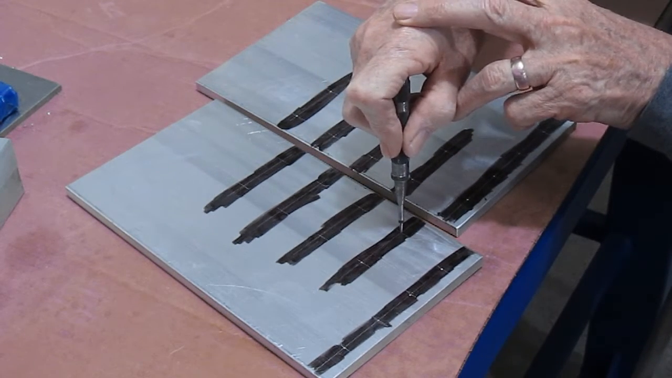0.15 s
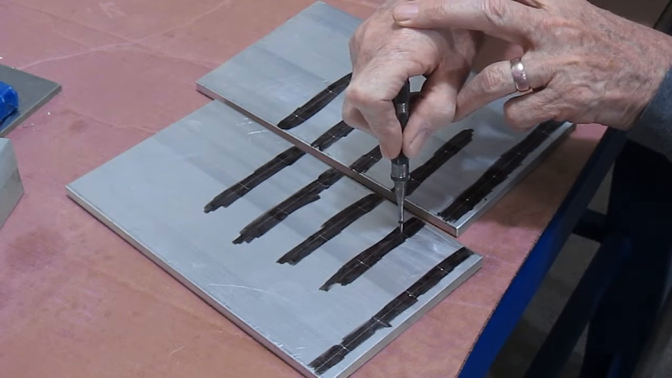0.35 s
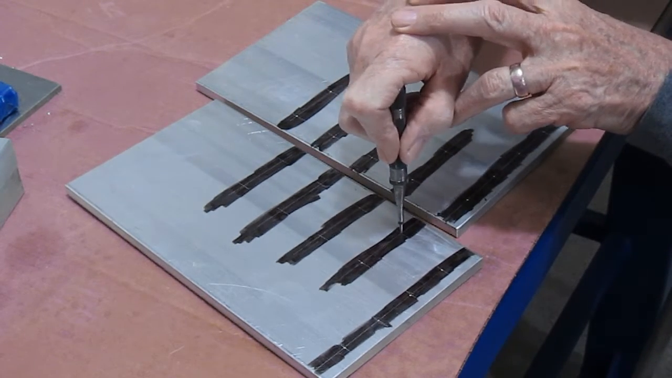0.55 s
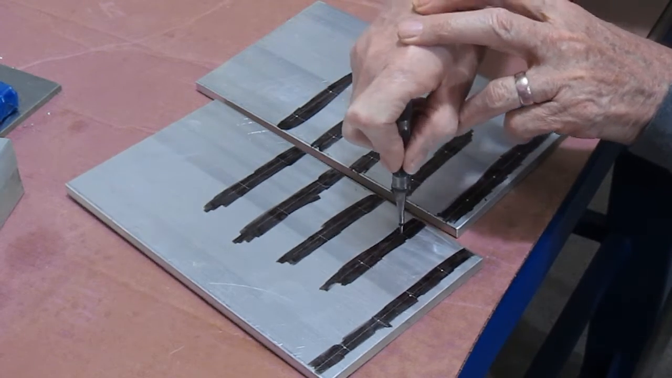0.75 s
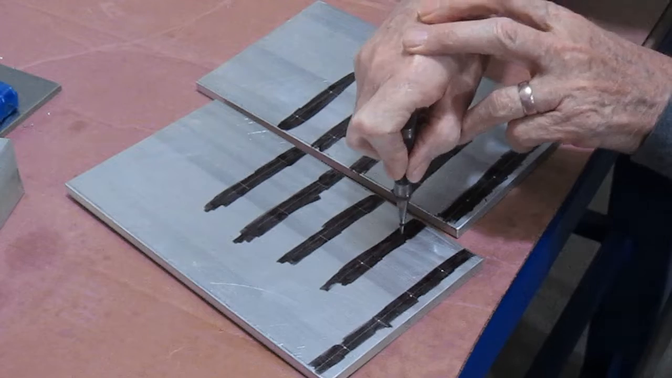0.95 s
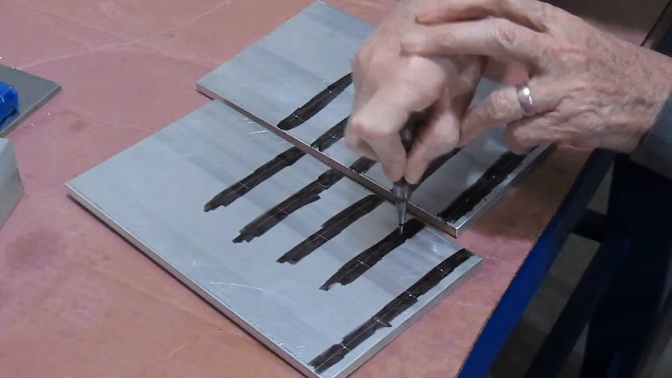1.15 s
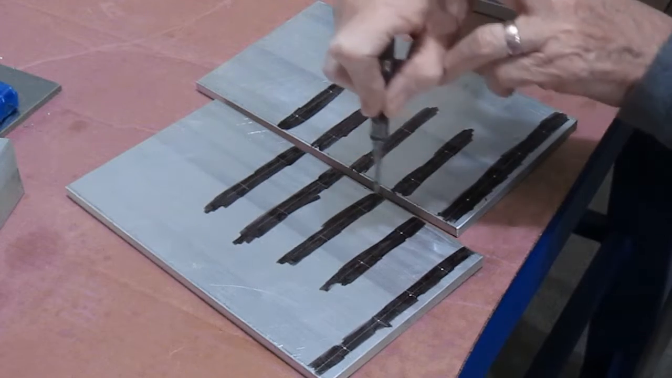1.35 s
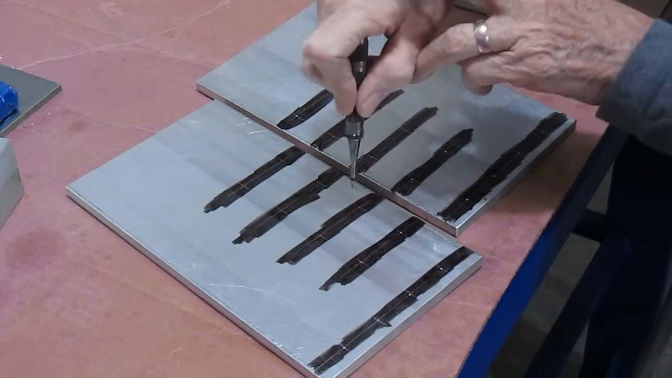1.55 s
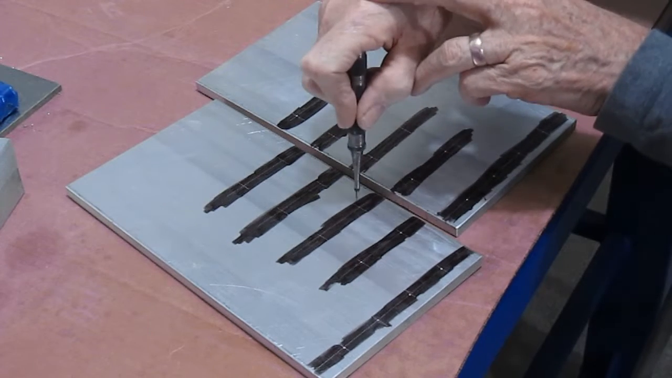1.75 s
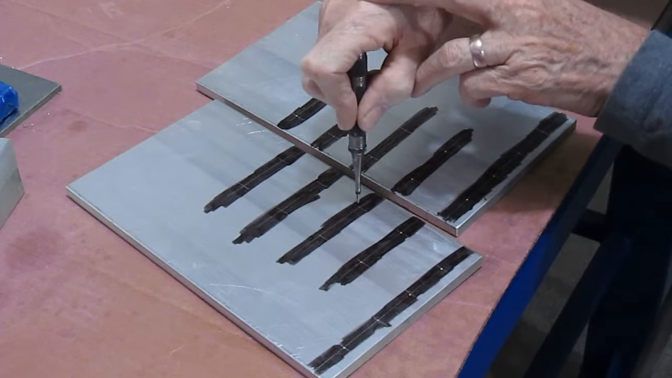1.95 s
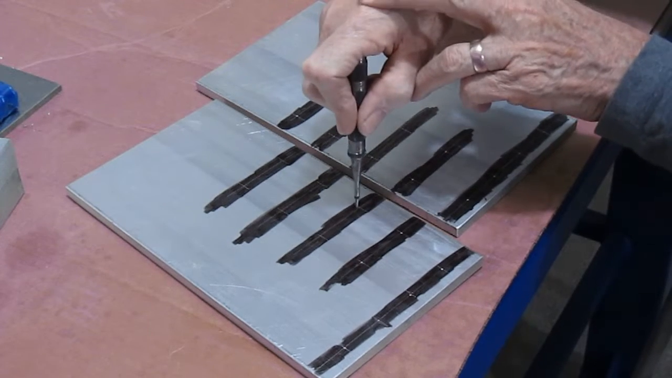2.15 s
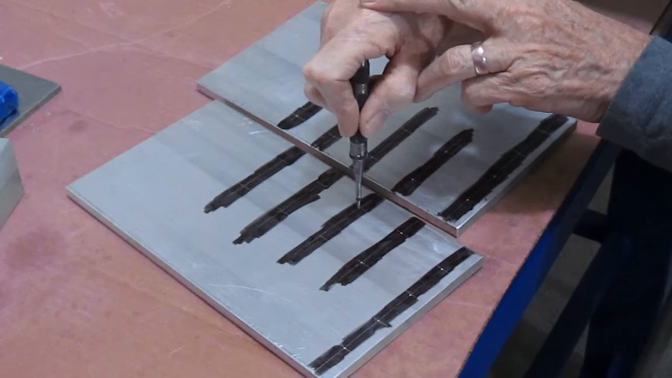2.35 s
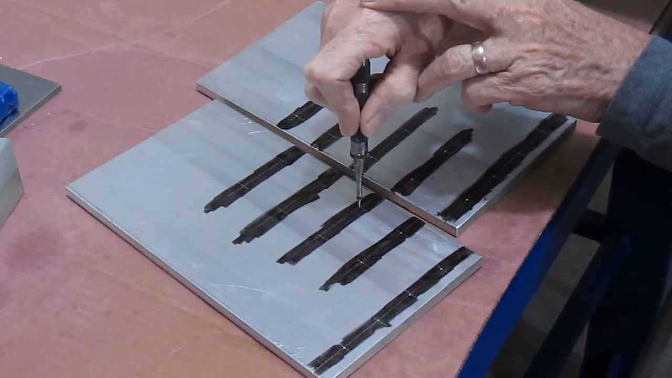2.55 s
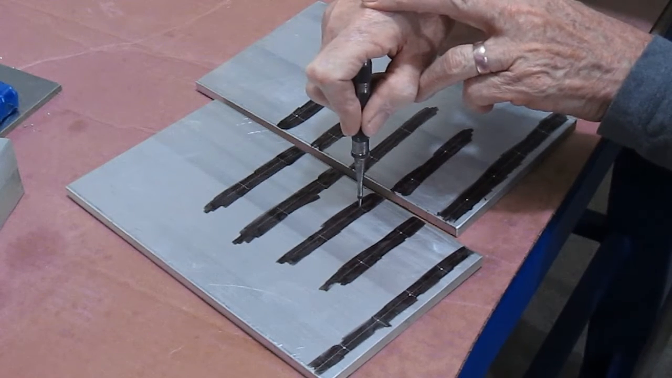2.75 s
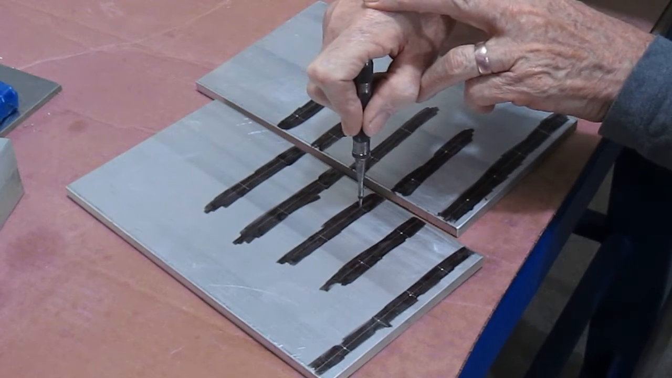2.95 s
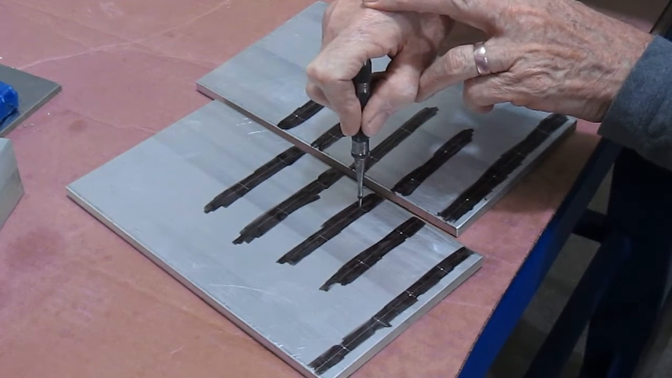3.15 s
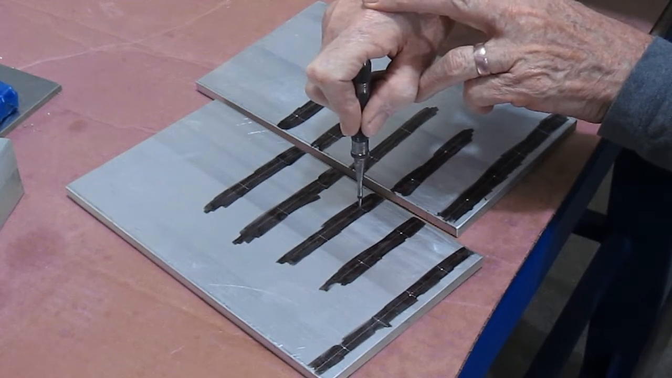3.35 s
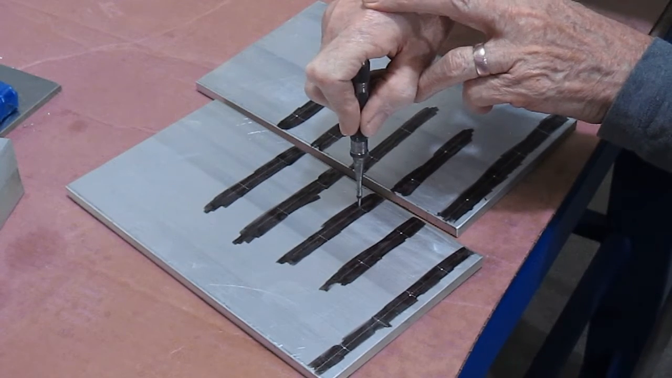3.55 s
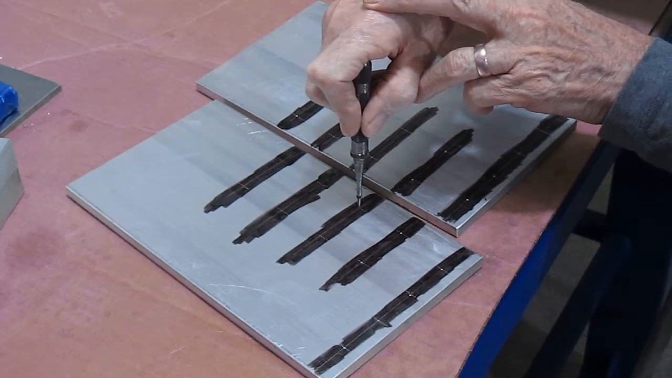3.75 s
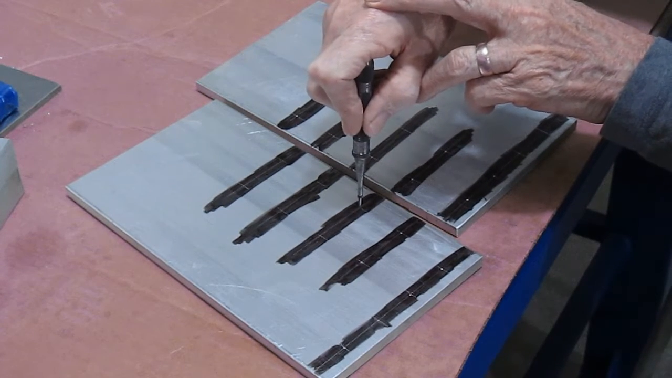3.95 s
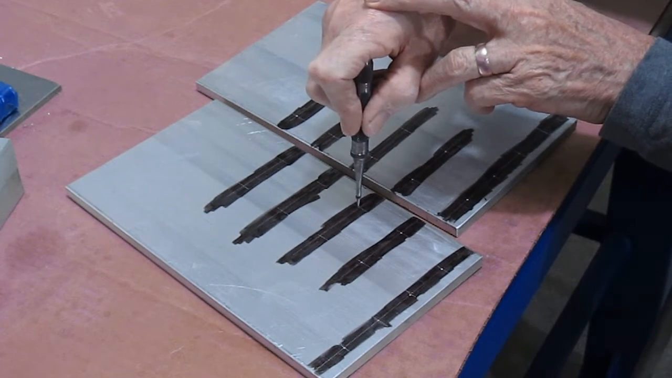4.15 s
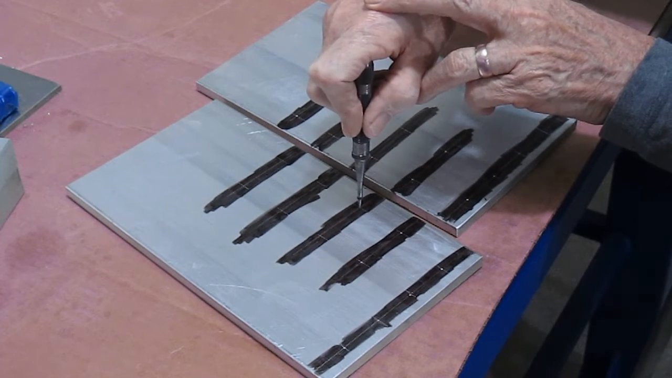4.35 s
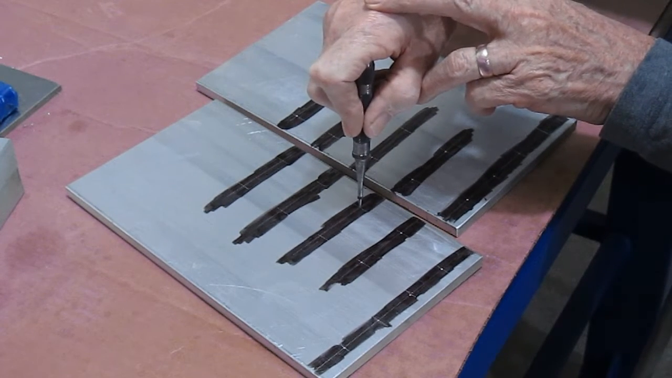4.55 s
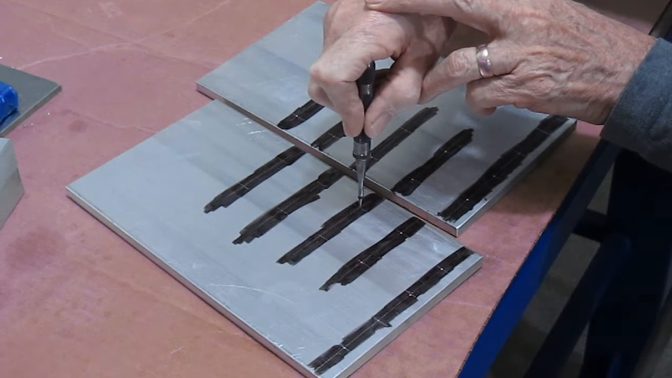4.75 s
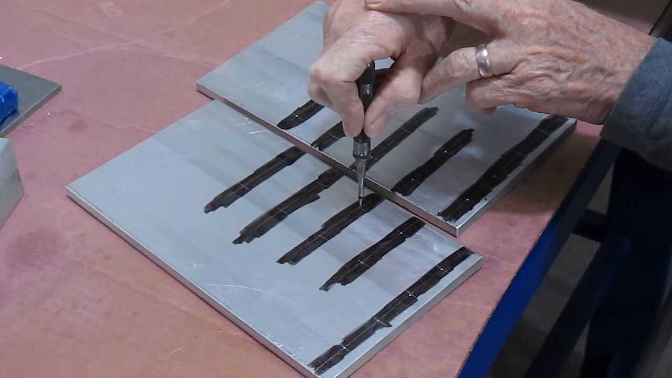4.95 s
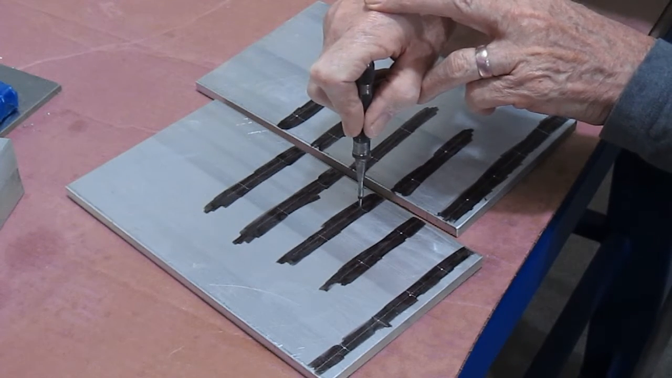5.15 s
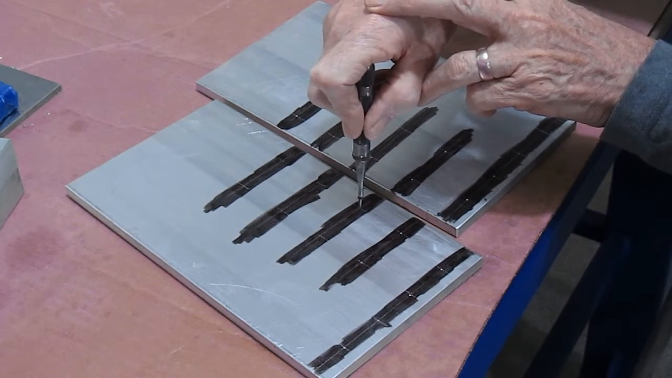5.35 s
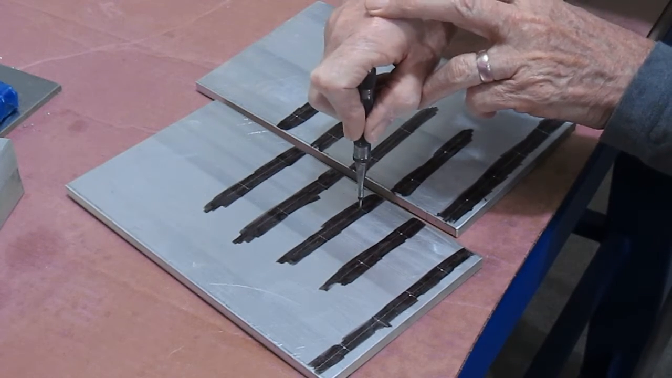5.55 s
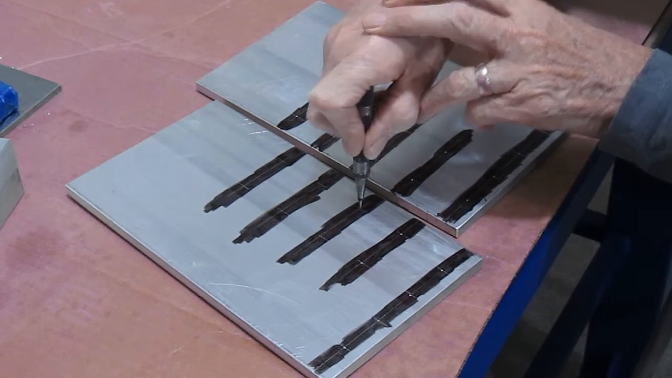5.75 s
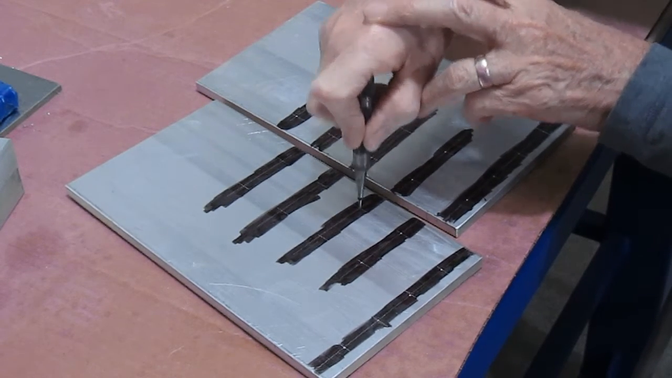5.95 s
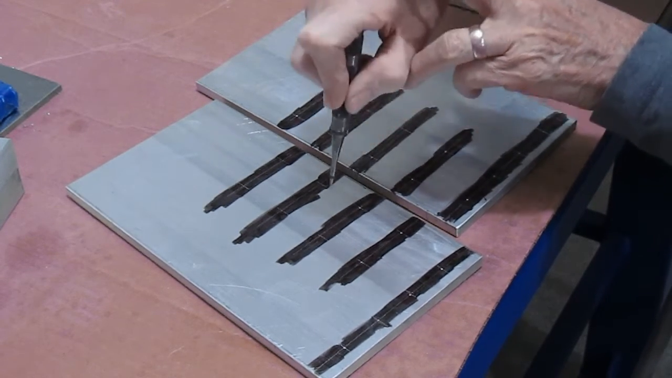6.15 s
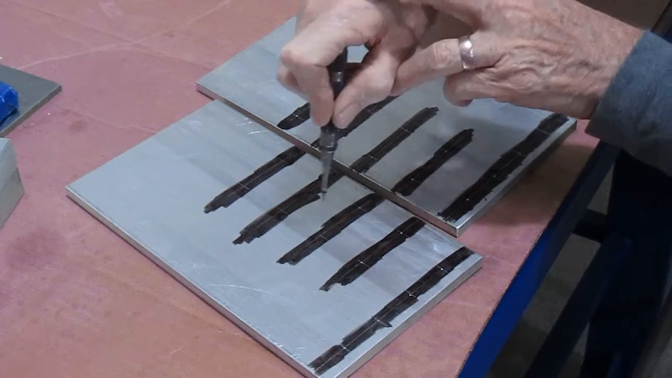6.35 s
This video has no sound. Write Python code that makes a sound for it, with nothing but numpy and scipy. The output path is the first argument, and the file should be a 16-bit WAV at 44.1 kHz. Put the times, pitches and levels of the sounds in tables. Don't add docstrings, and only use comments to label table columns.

```python
import sys
import numpy as np
from scipy import signal
from scipy.fft import rfft, irfft
from scipy.io import wavfile
from scipy.ndimage import uniform_filter1d

SR = 44100
rng = np.random.default_rng(int(sys.argv[2]) if len(sys.argv) > 2 else 0)


def level_to_linear(level):
    exponent = np.asarray(level, float) / 20
    return 10 ** exponent


def log_audio(samples):
    frames = np.atleast_2d(samples).T
    limited = np.clip(frames, -1, 1)
    pcm = np.round(limited * 32767).astype(np.int16)
    wavfile.write(sys.argv[1], SR, pcm)


N = 286191

PLATE_HZ = [686, 1490, 1556, 1700, 1745, 1808, 1890, 2250, 2392, 2642, 2745, 2822, 3365, 3740, 4361, 5000,
            5074, 5145, 5595, 5740, 5815, 6052, 6143, 6208, 6400, 6530, 6727, 6780, 6895, 6950]
PUNCH_HZ = [8398, 9075, 9235, 10675, 11340, 11850, 12595, 13910, 14985]
# blow at first spot in [dB], blow at second spot in [dB], lasting ring in [dB].
PLATE_DB = [(-19, -31, -37), (-35, -18, -43.5), (-38.5, -21.5, -34.5), (-20, -16.5, -39), (-14, -13, -31),
            (-18.5, -19.5, -27.5), (-23.5, -22.5, -30.5), (-10.5, -20, -26), (-26.5, -24, -37),
            (-9, -2.5, -32), (-18.5, -11.5, -43), (-36, -26, -40), (-22, -39.5, -38.5), (-25, -38, -44),
            (-28, -34, -48), (-44.5, -26.5, -41.5), (-33, -28.5, -30.5), (-49.5, -24.5, -43),
            (-25, -19.5, -43.5), (-13.5, -18.5, -38.5), (-6.5, -16, -27.5), (-32, -18.5, -36),
            (-23.5, -15.5, -29.5), (-9, -4.5, -33.5), (-22.5, -25.5, -35.5), (-33.5, -20, -36.5),
            (-11.5, -15, -38), (-14.5, -13.5, -23.5), (-24.5, -23, -32), (-18, -23.5, -43)]
# blow at first spot in [dB], blow at second spot in [dB], lasting ring in [dB].
PUNCH_DB = [(-34, -42.5, -38), (-29, -22.5, -41), (-46, -31.5, -41.5), (-44, -46, -51), (-40, -43, -46),
            (-39, -48, -50), (-52, -48, -53), (-76.5, -48.5, -68), (-43.5, -50, -59.5)]
MODE_HZ, MODE_DB = np.array(PLATE_HZ + PUNCH_HZ), np.transpose(PLATE_DB + PUNCH_DB)
# start in [s], tip push in [dB], hammer lag in [s], crack in [dB], thump in [dB].
SNAPS = [
    (1.059, -7.5, 0.0023, 0, -30.5),
    (5.8255, -6.5, .0021, 0, -28),
]
# frequency in [Hz], gain in [dB].
MIC_DIP = [(3300, -2.5), (4050, -14), (4400, 3), (4800, 0)]
SPOT_MOVE_S = 1.5
LEFT_RIGHT = np.array([[1], [-1]])


def along(hz, points):
    points_hz, values = np.transpose(points)
    return np.interp(np.log(np.maximum(hz, 1)), np.log(points_hz), values)


def colour(x, points):
    size = len(x)
    gain = level_to_linear(along(np.fft.rfftfreq(size, 1 / SR), points))
    cep = irfft(np.log(gain), size)
    cep[1:size // 2] *= 2
    cep[size // 2 + 1:] = 0
    return irfft(rfft(x) * np.exp(rfft(cep)), size)


def band(x, hz, width_hz):
    b, a = signal.iirpeak(min(hz, 0.45 * SR), hz / width_hz, SR)
    return signal.lfilter(b, a, signal.lfilter(b, a, x))


def unit(x):
    return x / np.sqrt(np.mean(x ** 2))


def fade(t60_s, size):
    return np.exp(-np.log(1000) * np.arange(size) / SR / max(t60_s, 0.001))


def add(track, start_s, x):
    i = int(start_s * SR)
    track[i:i + len(x)] += x[:N - i]


def ring(hz, db, t60_s, size, rough=0.0):
    t = np.arange(size) / SR
    hz, db, t60_s = (np.reshape(np.asarray(v, float), (-1, 1)) for v in (hz, db, t60_s))
    sign = np.sign(rng.standard_normal(hz.shape))
    if rough:
        steps = rng.standard_normal((len(hz), size // 256 + 1))
        waver = np.repeat(steps, 256, axis=1)[:, :size]
        sign = sign * (1 + rough * uniform_filter1d(waver, 400, axis=1))
    decay = np.exp(-np.log(1000) * t / np.maximum(t60_s, 0.003))
    return np.sum(sign * level_to_linear(db) * np.sin(2 * np.pi * hz * t) * decay, axis=0)


def gain_db():
    earlier_snap_s, duck_lag_s, duck_s = -2.1, 0.21, 0.06
    ducked_db, creep_db_per_s = -74, 3.5
    t = np.arange(N) / SR
    ducks_s = np.array([earlier_snap_s] + [row[0] + duck_lag_s for row in SNAPS])
    since_s = t - ducks_s[np.searchsorted(ducks_s, t) - 1]
    return uniform_filter1d(ducked_db + creep_db_per_s * since_s, int(duck_s * SR))


def hush():
    # frequency in [Hz], density in [dB per Hz].
    mid_curve = [(18, -45), (30, -22), (105, 0.5), (152, -2), (299, -2.5), (359, -4), (546, -6.5),
                 (897, -7.5), (1470, -13.5), (2910, -17.5), (4090, -30.5), (4420, -24), (7080, -23),
                 (12900, -41.5), (15500, -61)]
    # frequency in [Hz], density in [dB per Hz].
    side_curve = [(18, -52.5), (30, -12), (102, -2.5), (173, 0.5), (270, 1.5), (2760, -24), (3980, -33.5),
                  (5890, -29), (6890, -41), (8280, -75), (15500, -72)]
    hum_hz = [896, 3567, 4443, 12454]
    hum_db = [-14.5, -26.5, -23, -42]
    t = np.arange(N) / SR
    whine = sum(level_to_linear(db) * np.sin(2 * np.pi * hz * t) for hz, db in zip(hum_hz, hum_db))
    mid = unit(colour(rng.standard_normal(N), mid_curve)) + whine
    side = level_to_linear(7.0) * unit(colour(rng.standard_normal(N), side_curve))
    return level_to_linear(3.5 + gain_db()) * (mid + side * LEFT_RIGHT)


def shop(x, alike):
    # band centre in [Hz], t60 in [s], level in [dB].
    tail_bands = [(221, 0.71, 4), (510, 0.74, -3), (700, .5, 3), (1527, 0.51, 0), (4000, 0.2, 4.5),
                  (7600, 0.45, -1.5), (13000, .15, -24)]
    size = SR
    onset = np.clip(np.arange(size) / SR / 0.0027, 0, 1)

    def answer():
        tail = sum(level_to_linear(db) * band(rng.standard_normal(size), hz, hz) * fade(t60_s, size)
                   for hz, t60_s, db in tail_bands)
        return signal.fftconvolve(x, tail * onset / np.sqrt(np.sum(tail ** 2)))[:N]

    mid, side = answer(), answer()
    return mid + np.sqrt((1 - alike) / (1 + alike)) * side * LEFT_RIGHT


def far_clacks():
    # start in [s], peak in [dB], lows in [dB].
    clack_rows = [
        (0.096, -59, 2),
        (0.7345, -53, 4),
        (2.936, -47, 5),
        (3.017, -47, 4.5),
        (3.107, -42, 0.5),
        (3.214, -40.5, -2.5),
        (4.4982, -28.5, -6.5),
    ]
    # frequency in [Hz], body gain in [dB].
    body = [(1000, -11.5), (1800, -2.5), (3000, -4.5), (4100, -11), (4800, -6.5), (5250, 0), (5800, -9.5),
            (8600, 2.5), (9700, 7), (10400, -10.5), (15000, -31)]
    out, size = np.zeros(N), SR // 5
    rise = np.clip(np.arange(size) / SR / 0.0031, 0, 1)
    late = np.sqrt(np.arange(size) / size) * fade(0.16, size)
    for start_s, db, low_db in clack_rows:
        burst = colour(rng.standard_normal(size) * rise * fade(0.066, size), body)
        burst = colour(burst, [(300, -63), (3000, -12), (5000, -0.5), (9600, -22)])
        add(out, start_s, level_to_linear(db + 6) * burst)
        lows = colour(rng.standard_normal(size) * late, body)
        lows = colour(lows, [(300, -6), (480, 8), (800, 0.0), (3000, -2.5), (3600, -31)])
        add(out, start_s, level_to_linear(db + 16.0 + low_db) * lows)
    return out


def rustles():
    # start in [s], peak in [dB], lows in [dB].
    rustle_rows = [(0.7455, -56.5, 11), (1.576, -67, 6), (1.8578, -77, 13), (1.929, -72, -0.5),
                   (2.0194, -70, 14), (2.445, -68, 16), (2.657, -65, 20.5), (2.7194, -61, 16),
                   (2.8841, -66, 18), (3.911, -60.5, 17.5), (4.2863, -58.5, 20.5), (4.4043, -57.5, 18.5),
                   (6.378, -66.5, 18.5)]
    out, size = np.zeros(N), SR // 5
    swell = np.exp(-((np.arange(size) / SR - 0.01) / 0.01) ** 2)
    for start_s, db, low_db in rustle_rows:
        hiss = colour(rng.standard_normal(size) * swell,
                      [(300, low_db - 9.5), (2000, low_db), (6000, -1.5), (12500, -4), (15000, -20)])
        add(out, start_s, level_to_linear(db - 4.5) * colour(hiss, MIC_DIP))
    return out


def bench():
    # start in [s], peak in [dB], overtone in [dB].
    shudders = [
        (0.155, -64.5, -21),
        (3.081, -58, -12),
        (3.303, -58, -24),
        (3.534, -58.5, -3),
        (3.919, -52.5, -23),
        (4.137, -48.5, -30),
        (4.363, -53.5, -5),
        (4.664, -55.5, -16),
        (5.372, -51, -17),
    ]
    # start in [s], peak in [dB], frequency in [Hz].
    thumps = [
        (0.604, -47, 125.4),
        (1.25, -48, 141.4),
        (2.773, -59.5, 204.6),
        (5.492, -50, 175),
        (6.014, -41.5, 159.4),
    ]
    shudder_hz, shudder_s, thump_s, thump_over_db = 186.9, 0.059, 0.0296, -15.5
    out, t = np.zeros(N), np.arange(SR // 3) / SR
    rows = [(start_s, db, shudder_hz, over_db, shudder_s) for start_s, db, over_db in shudders]
    rows += [(start_s, db, hz, thump_over_db, thump_s) for start_s, db, hz in thumps]
    for start_s, db, hz, over_db, length_s in rows:
        swell = np.clip(t / 0.0072, 0, 1) * np.exp(-(t / length_s) ** 2)
        rough = 1 + 0.75 * unit(uniform_filter1d(rng.standard_normal(len(t)), SR // 100))
        tone = np.sin(2 * np.pi * hz * t) + level_to_linear(over_db) * np.sin(4 * np.pi * hz * t)
        add(out, start_s, level_to_linear(db) * swell * rough * tone)
    return out


def press():
    # time in [s], effort in [dB].
    efforts = [
        [(0.72, -13), (0.856, -1), (0.918, -12), (0.972, -4.5), (1.002, -0.5), (1.052, -3.5)],
        [(5.6, -19.5), (5.634, -30), (5.644, -3), (5.758, -3), (5.786, 0), (5.818, 5)],
    ]
    rub_hz = [690, 1490, 1740, 1825, 2640, 2740, 5770]
    rub_db = [1.5, -10.5, -2, -11.5, -0.5, -10, -26]
    rumble_level_db, rub_level_db, rub_db_per_effort_db = -51, -50, 2.2
    t, size = np.arange(N) / SR, SR // 4
    low = band(rng.standard_normal(N), 175, 90)
    rumble = unit(low + 0.5 * band(rng.standard_normal(N), 83, 61))
    grit = rng.standard_normal(N) * level_to_linear(3 * rng.exponential(size=N))
    body = ring(rub_hz, rub_db, 0.1, size) + level_to_linear(22.5) * band(fade(0.001, size), 1800, 2500)
    rub = unit(signal.fftconvolve(grit, body)[:N])
    out = np.zeros(N)
    for rows in efforts:
        times_s, effort_db = np.transpose(rows)
        inside = np.clip(np.minimum(t - times_s[0], times_s[-1] + 0.02 - t) / 0.017, 0, 1)
        effort = np.interp(t, times_s, effort_db)
        shake = rumble * level_to_linear(rumble_level_db + effort)
        out += inside * (shake + rub * level_to_linear(rub_level_db + rub_db_per_effort_db * effort))
    return out


def spring_ticks():
    # start in [s], peak in [dB], centre in [Hz].
    tick_rows = [
        (0.7016, -45.5, 6440),
        (0.7274, -45, 5040),
        (0.7693, -49, 4814),
        (6.3714, -57.5, 5960),
        (6.4117, -59.5, 5070),
    ]
    out, size = np.zeros(N), SR // 4
    for start_s, db, hz in tick_rows:
        burst = rng.standard_normal(size) * fade(0.006, size)
        add(out, start_s, level_to_linear(db) * band(burst, hz, 4000))
    return out


def resets():
    # start in [s], level in [dB], share of ring time [ratio].
    reset_rows = [
        (1.247, -2.5, 0.15),
        (1.297, -2, 0.25),
        (6.0215, 1.5, 0.25),
        (6.065, -2.5, 0.24),
    ]
    # frequency in [Hz], level in [dB].
    drop_curve = [(900, -38), (2400, -36), (5800, -32.5), (10000, -52)]
    # frequency in [Hz], level in [dB].
    catch_curve = [(900, -37), (2400, -48), (4500, -40), (6500, -49), (8800, -43), (12500, -50)]
    out, size = np.zeros(N), SR // 4
    rise = np.clip(np.arange(size) / SR / 0.001, 0, 1)
    t60_s = along(MODE_HZ, [(3000, 0.51), (7000, 0.21), (9000, 0.49)])
    for (start_s, db, share), curve in zip(reset_rows, 2 * [drop_curve, catch_curve]):
        blow_db = MODE_DB[int(start_s > SPOT_MOVE_S)]
        modes_db = 0.5 * blow_db - 1.5 + db + along(MODE_HZ, curve)
        add(out, start_s, ring(MODE_HZ, modes_db, share * t60_s, size, rough=0.8))
        click = rng.standard_normal(size) * rise * (fade(0.016, size) + 0.51 * fade(0.11, size))
        edges = [(300, curve[0][1] - 16.5)] + curve + [(14500, curve[-1][1] - 20)]
        add(out, start_s, level_to_linear(3.0 + db) * colour(colour(click, MIC_DIP), edges))
    return out


def tip_touches():
    # start in [s], click in [dB], ring in [dB], brightness in [dB per octave].
    touch_rows = [
        (.6068, -29, -1, 1.1),
        (2.3115, -61, -17.5, -0.5),
        (4.2755, -42, -3.5, -7),
        (5.5066, -32.5, 0, 0.5),
    ]
    touch_hz = [593, 665, 748, 820, 975, 1120, 1290, 1355, 1505, 1585, 1771, 1929, 2263, 2750, 2824, 3437,
                4413, 6200, 6760]
    # level at first spot in [dB], level at second spot in [dB].
    touch_db = [(-56, -53), (-41.5, -45), (-50, -54), (-50.5, -48.5), (-47, -51.5), (-51.5, -54.5),
                (-50.5, -46.5), (-53, -51.5), (-45, -51.5), (-52.5, -51.5), (-59.5, -52.5), (-58.5, -51),
                (-59, -54), (-48, -51.5), (-57.5, -48), (-55.5, -75), (-59, -74), (-66, -62.5),
                (-63, -68.5)]
    # frequency in [Hz], t60 in [s].
    touch_t60 = [(600, 0.14), (1300, .1), (2800, .13), (3400, .09), (6500, .05)]
    out, size = np.zeros(N), SR // 4
    octaves = np.log2(np.array(touch_hz) / touch_hz[4])
    for start_s, click_db, ring_db, bright_db in touch_rows:
        click = colour(rng.standard_normal(size) * fade(0.014, size),
                       [(300, -18.0), (1200, -1.5), (3000, -15.5), (5000, -20.5), (8500, -12), (11000, -39)])
        modes_db = np.transpose(touch_db)[int(start_s > SPOT_MOVE_S)] + ring_db + bright_db * octaves
        plate = ring(touch_hz, modes_db, along(touch_hz, touch_t60), size, rough=0.92)
        add(out, start_s, plate + level_to_linear(click_db) * click)
    return out


def snaps():
    # frequency in [Hz], t60 in [s].
    blow_t60 = [(700, 0.15), (2600, 0.11), (6000, 0.063), (12000, 0.12)]
    # frequency in [Hz], t60 in [s].
    ring_t60 = [(700, 0.15), (3000, .35), (5100, 0.34), (5800, .27), (7000, .24), (12000, .28)]
    loose_hz = [1764, 1593, 1485]
    # first snap in [dB], second snap in [dB], t60 in [s].
    loose_modes = [(-58, -59, 2.6), (-76.5, -57, 0.88), (-75.5, -59, 1.7)]
    # frequency in [Hz], level in [dB].
    clatter_curve = [(300, -24), (450, -8), (800, 4.5), (1300, 1), (2500, 1), (3400, -2), (4800, 6.5),
                     (6800, -1.5), (7700, -14), (9300, -13), (10000, -29), (13000, -45.5)]
    spot_share = 0.84
    out, size = np.zeros(N), SR // 4
    quick_s, lasting_s = along(MODE_HZ, blow_t60), along(MODE_HZ, ring_t60)
    dull_db = along(MODE_HZ, [(3000, -0.5), (5000, -23.5)])
    *loose_db, loose_s = np.transpose(loose_modes)
    for k, (start_s, push_db, lag_s, crack_db, thump_db) in enumerate(SNAPS):
        hit_s = start_s + lag_s
        blow_db = MODE_DB[k]
        lasting_db = MODE_DB[-1] + spot_share * (blow_db - MODE_DB[:2].mean(axis=0))
        add(out, start_s, ring(MODE_HZ, push_db + blow_db + dull_db, quick_s, size))
        add(out, hit_s, ring(MODE_HZ, blow_db - 3, quick_s, size, rough=0.4))
        add(out, hit_s, ring(MODE_HZ, lasting_db - 3.0, lasting_s, SR // 2, rough=1.8))
        clatter = rng.standard_normal(SR // 2) * (fade(0.057, SR // 2) + 0.24 * fade(0.36, SR // 2))
        add(out, hit_s, level_to_linear(-19.5) * colour(colour(clatter, clatter_curve), MIC_DIP))
        add(out, hit_s, ring(loose_hz, loose_db[k], loose_s, SR))
        crack = colour(rng.standard_normal(size) * fade(0.007, size),
                       [(300, -25.5), (1000, -1.5), (2500, 7.0), (4500, -0.5), (8000, -5.0),
                        (15000, -15), (17000, -37)])
        add(out, hit_s, level_to_linear(crack_db) * crack)
        thump_modes_db = thump_db + np.array([2, -2.5, -7, -3.5, -1.5, -10.5])
        add(out, start_s, ring([175, 268, 611, 758, 967, 1124], thump_modes_db,
                               [0.094, 0.092, 0.069, 0.16, 0.097, 0.086], size, rough=0.22))
    return out


def scene():
    near = snaps() + tip_touches() + resets() + spring_ticks()
    near = colour(near, [(30, -31.5), (70, -17.5), (150, 1.5)])
    far = far_clacks() + rustles()
    side = (np.roll(near, 37) - np.roll(near, 90)) * LEFT_RIGHT
    near_tail = shop(colour(near, [(9300, 0), (10300, -11), (14000, -22)]), 0.88)
    mix = near + level_to_linear(-23) * side + level_to_linear(-11.0) * near_tail
    mix = mix + level_to_linear(-1.5) * far + shop(far, 0.86)
    return mix + bench() + press() + hush()


def top_cut(x):
    return signal.sosfilt(signal.butter(12, 16360, fs=SR, output="sos"), x)


def record(dry):
    return top_cut(np.clip(dry, -1, 1))


dry = scene()
out = record(dry)
log_audio(out)
```